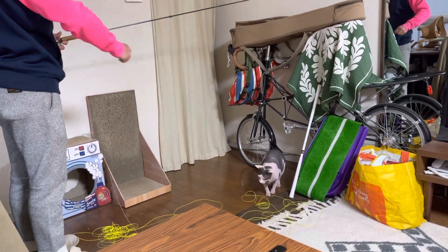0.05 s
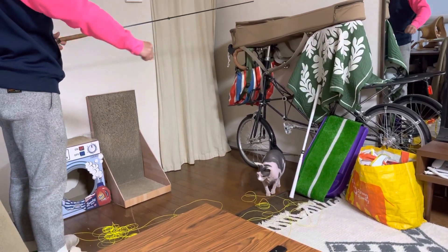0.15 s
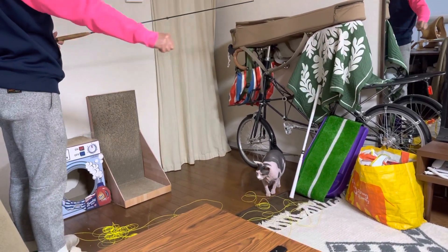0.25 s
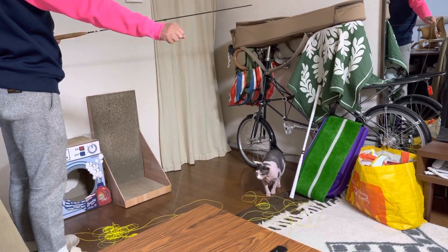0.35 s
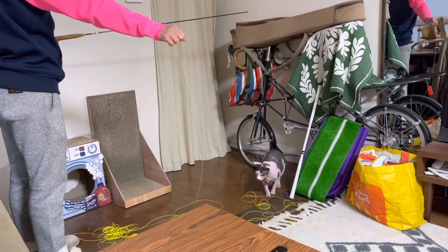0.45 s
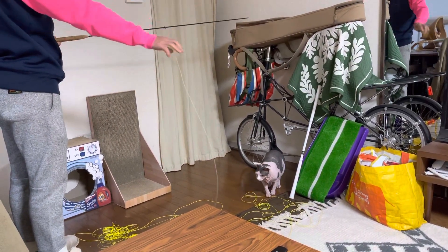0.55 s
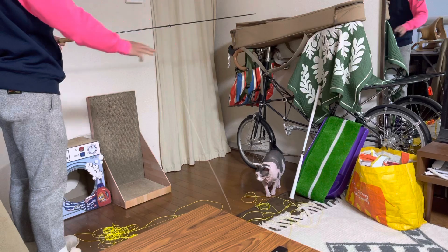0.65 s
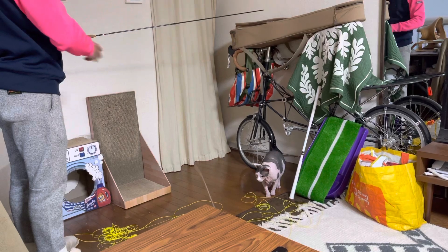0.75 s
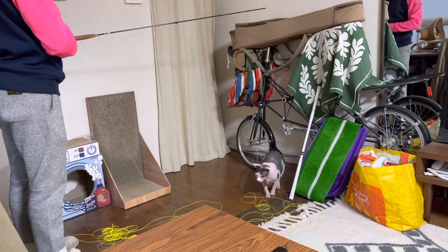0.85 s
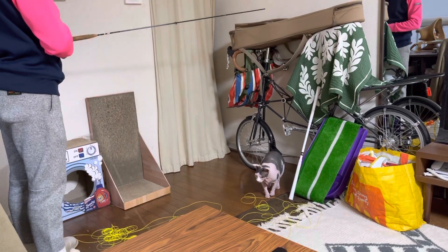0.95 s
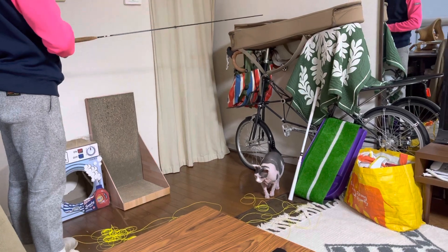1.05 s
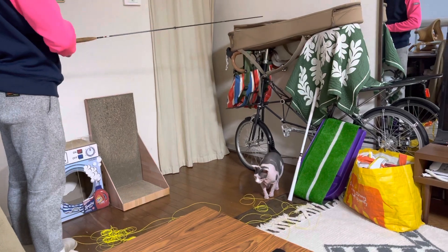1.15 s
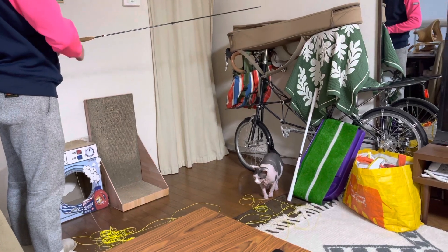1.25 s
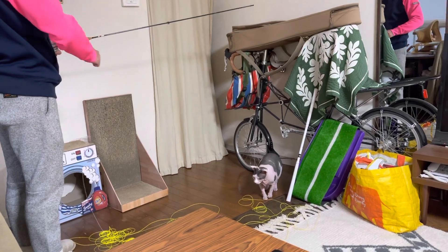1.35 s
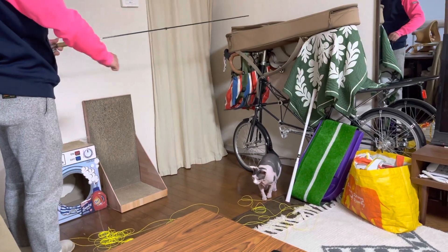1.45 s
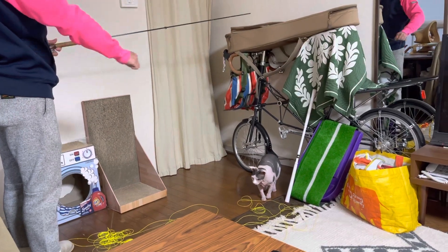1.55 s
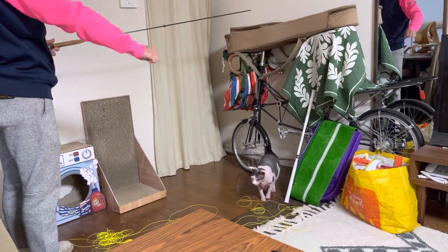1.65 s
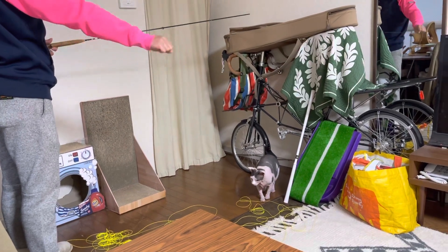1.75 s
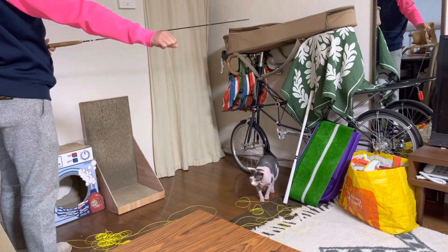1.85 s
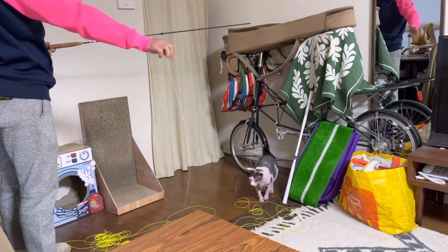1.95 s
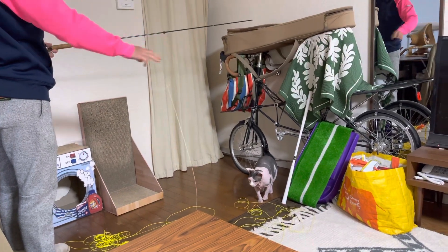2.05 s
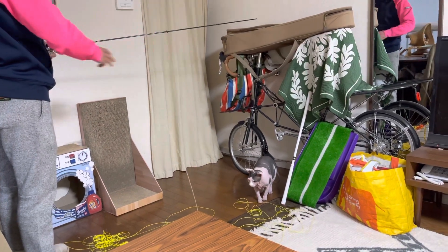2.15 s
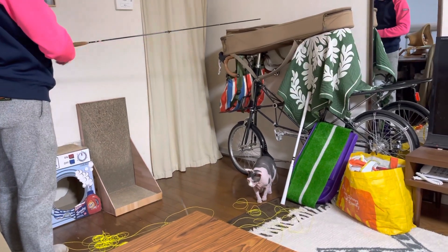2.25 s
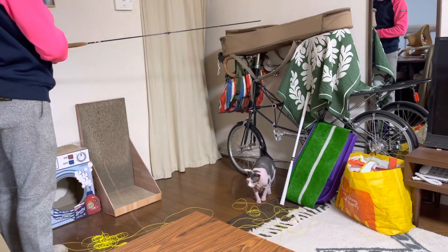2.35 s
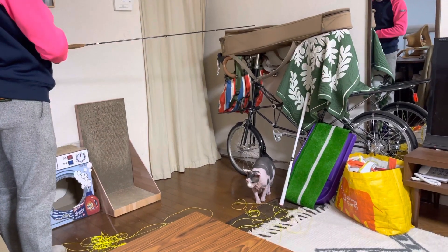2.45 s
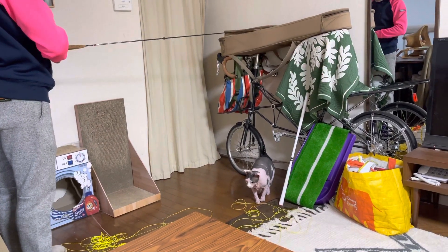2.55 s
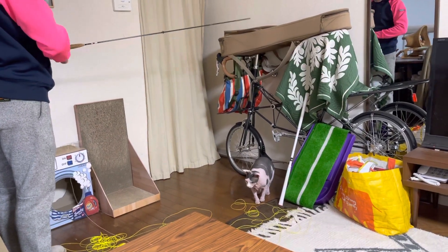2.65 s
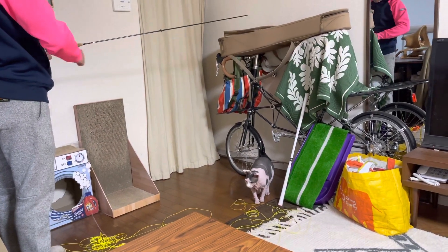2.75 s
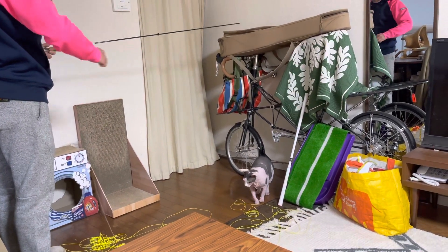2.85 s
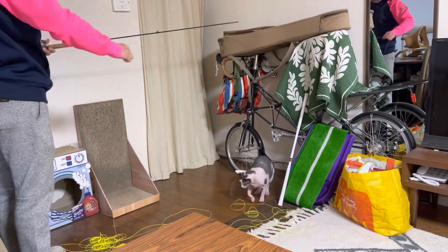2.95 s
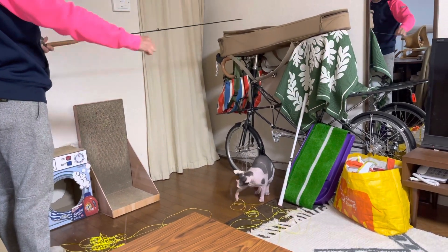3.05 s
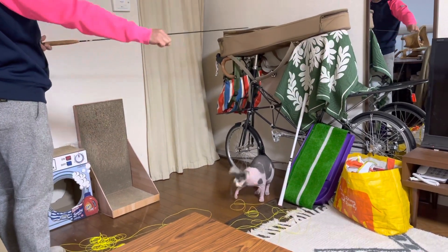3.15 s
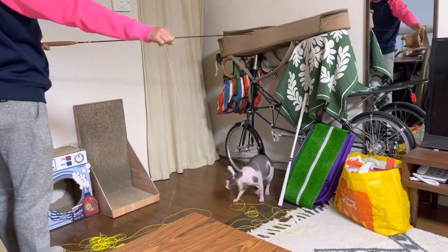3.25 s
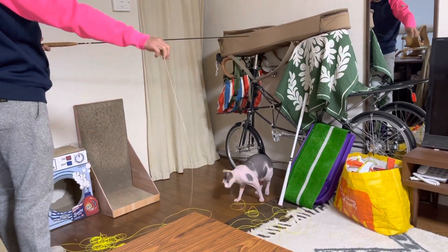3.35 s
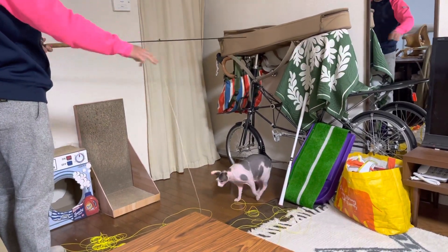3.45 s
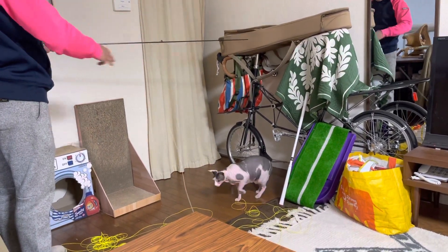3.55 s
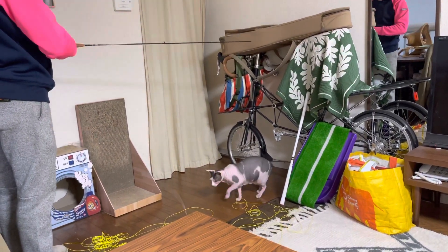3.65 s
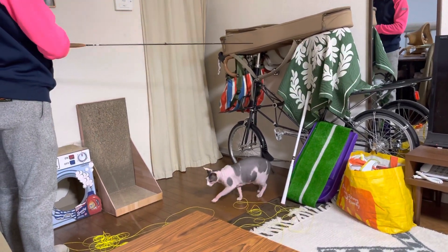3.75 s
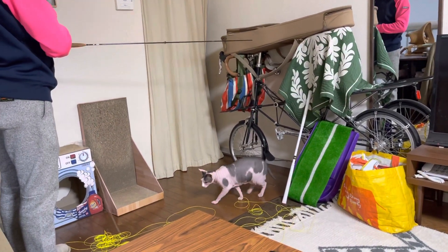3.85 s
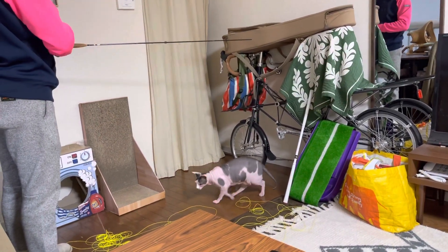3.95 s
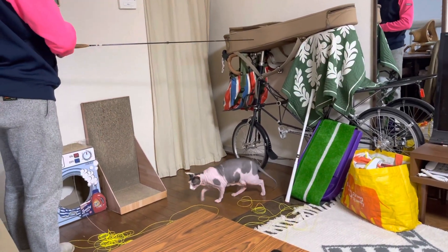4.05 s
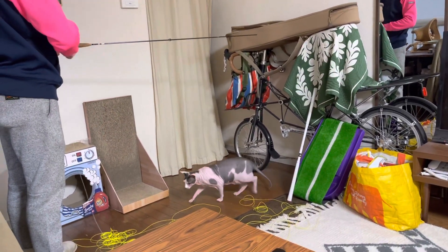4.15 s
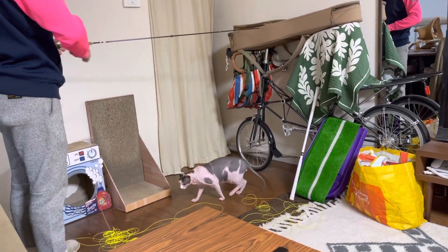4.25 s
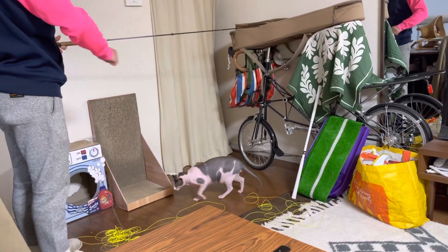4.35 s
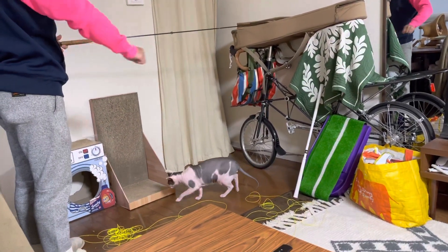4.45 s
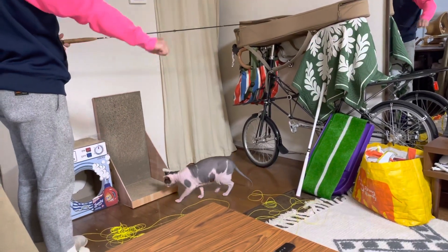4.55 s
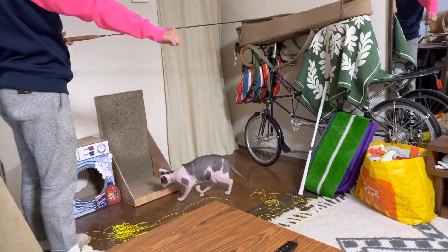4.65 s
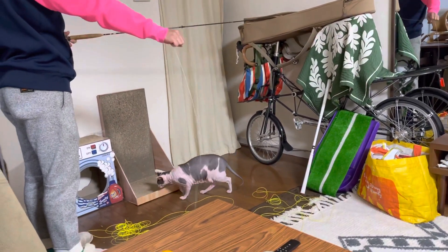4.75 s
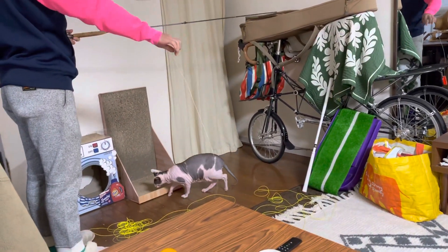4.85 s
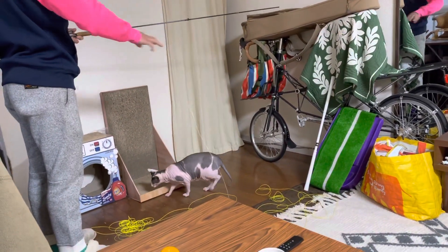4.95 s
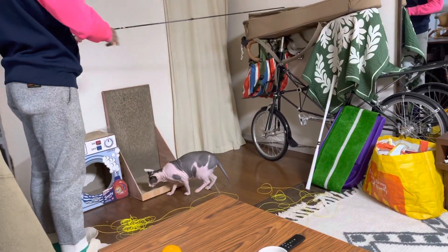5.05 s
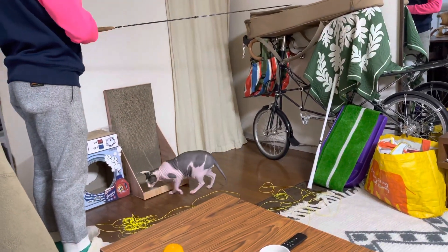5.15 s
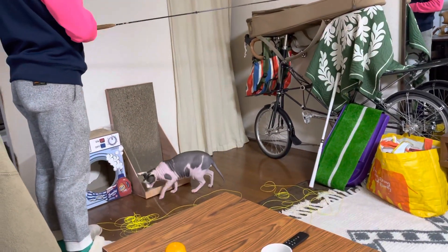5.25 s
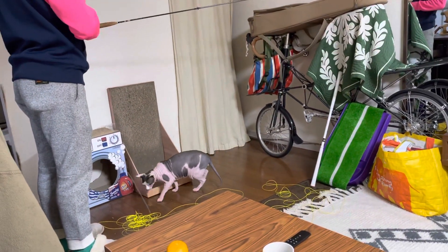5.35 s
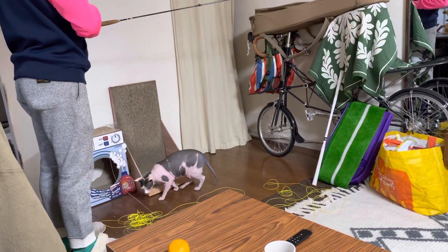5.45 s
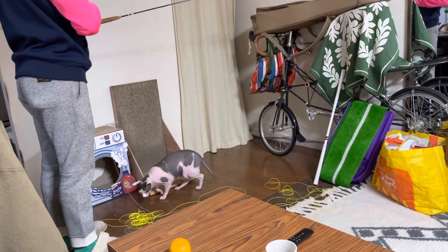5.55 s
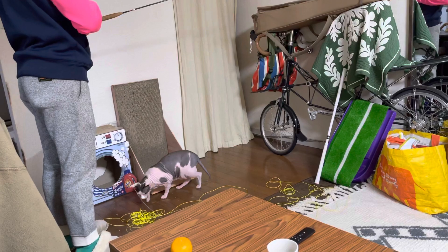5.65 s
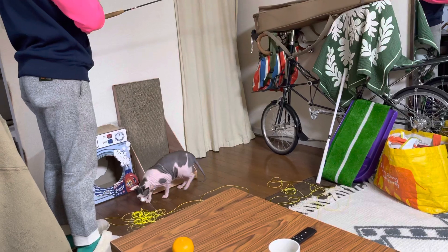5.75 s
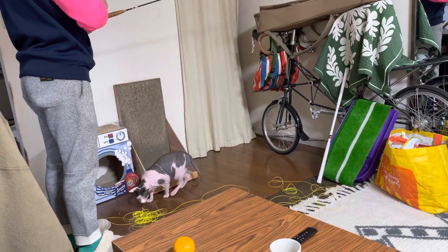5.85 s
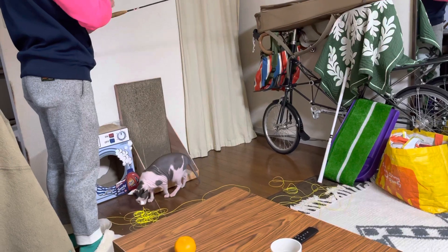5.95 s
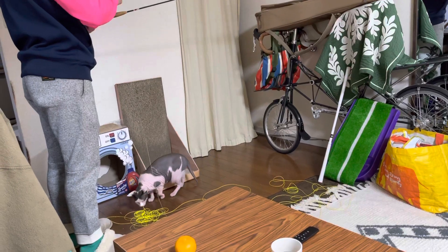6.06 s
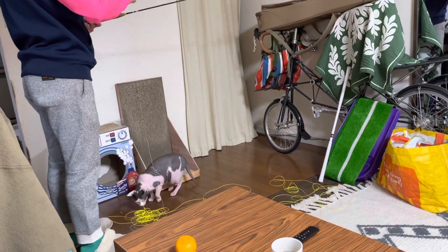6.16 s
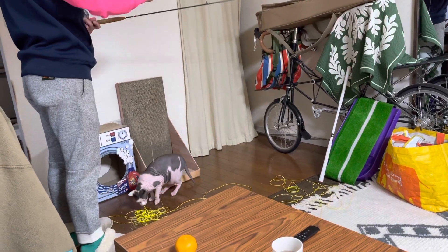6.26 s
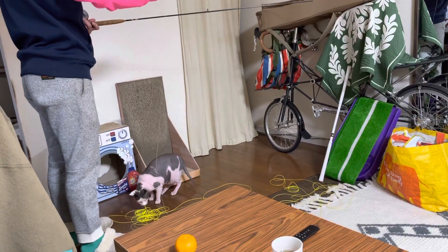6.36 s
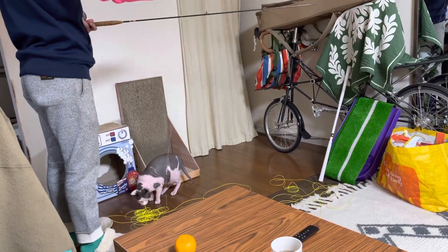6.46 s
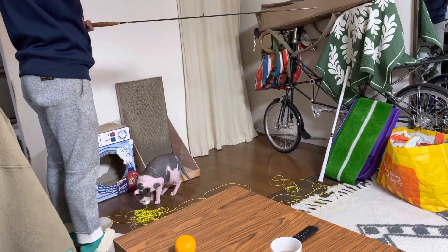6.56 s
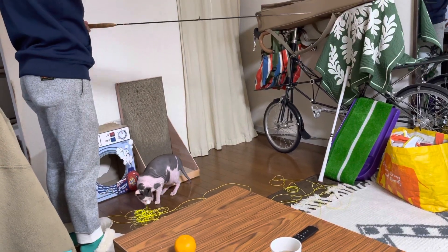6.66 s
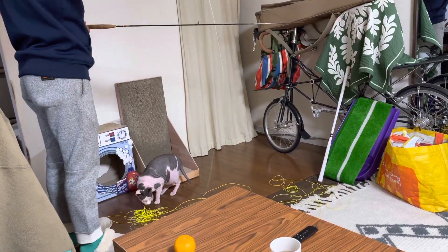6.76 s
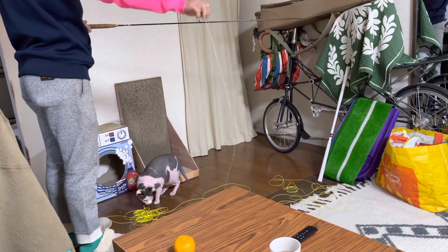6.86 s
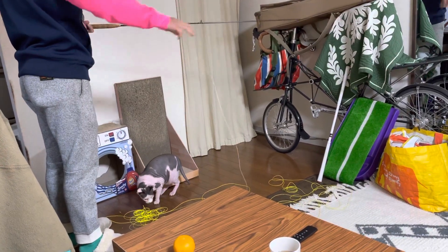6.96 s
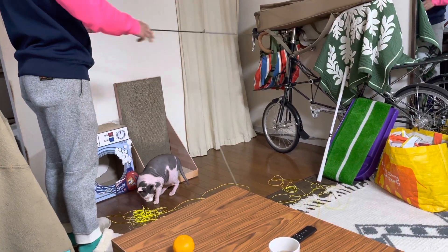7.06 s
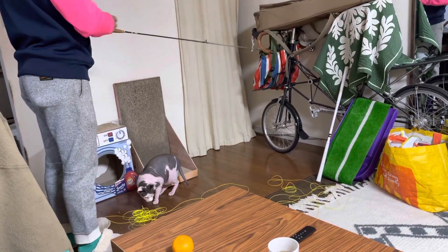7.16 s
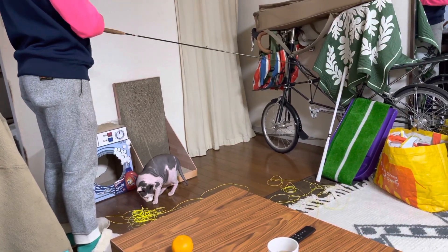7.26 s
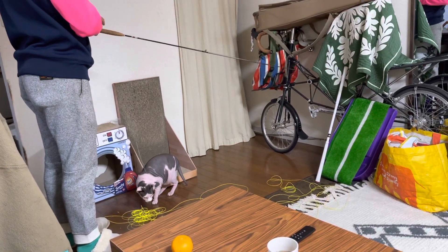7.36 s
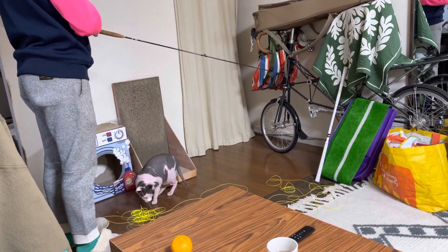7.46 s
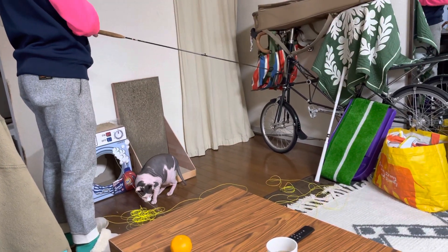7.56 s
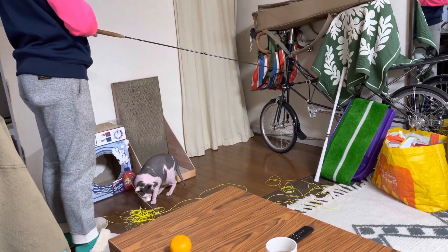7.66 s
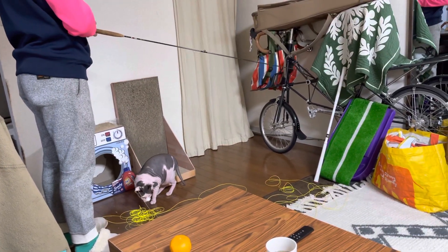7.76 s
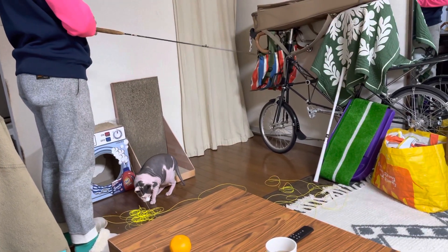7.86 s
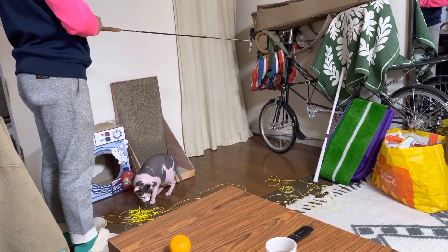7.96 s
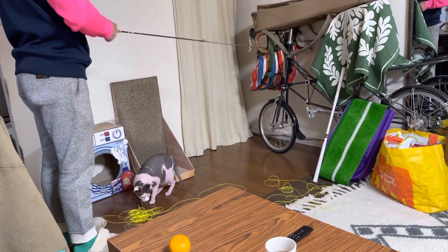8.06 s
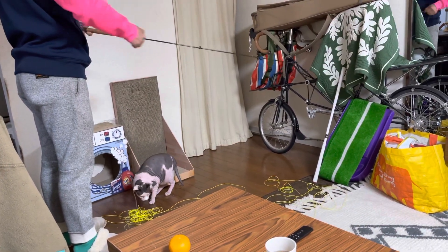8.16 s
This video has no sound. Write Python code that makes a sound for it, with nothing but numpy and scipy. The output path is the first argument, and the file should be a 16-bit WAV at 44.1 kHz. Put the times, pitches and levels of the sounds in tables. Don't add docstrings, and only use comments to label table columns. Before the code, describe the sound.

Close in a small quiet living room, a fishing reel's ratchet buzzes in short bursts as line is pulled off by hand. Four pulls come about a second and a half apart, each starting as fast clicks, rising to a crisp buzz, then stopping. A few slow separate clicks lead to a longer, accelerating pull; after a pause, one last burst surges up sharply. Soft hum and faint rustles fill the gaps; phone microphone, stereo.

```python
import sys
import numpy as np
from scipy import signal
from scipy.fft import rfft, irfft, next_fast_len
from scipy.io import wavfile
from scipy.ndimage import uniform_filter1d

SR = 44100
rng = np.random.default_rng(int(sys.argv[2]) if len(sys.argv) > 2 else 0)


def dump(signal):
    limited = np.clip(np.atleast_2d(signal).T, -1, 1)
    pcm = np.round(limited * 32767).astype(np.int16)
    wavfile.write(sys.argv[1], SR, pcm)


def makeup_ratio(level_db):
    decades = np.asarray(level_db, float) / 20
    return 10 ** decades


N = 361606

# t/s, rate/(teeth per s)
SPOOL_SPEED = [
    [(0, 405), (.06, 413), (.11, 512), (.178, 445), (.25, 455), (.322, 394), (.345, 335), (.46, 215)],
    [(1.154, 75), (1.19, 105), (1.29, 315), (1.362, 359), (1.43, 372), (1.5, 396), (1.656, 434),
     (1.708, 417), (1.87, 220)],
    [(2.606, 80), (2.66, 150), (2.79, 392), (2.9, 432), (2.946, 514), (3.02, 523), (3.068, 518),
     (3.122, 444), (3.3, 250)],
    [(4.103, 78), (4.14, 100), (4.26, 280), (4.4, 328), (4.514, 288), (4.67, 296), (4.71, 200)],
    [(5.661, 59), (5.725, 59), (5.765, 77), (5.805, 77), (5.84, 92), (5.93, 94), (6.0, 155)],
    [(6.012, 165), (6.08, 215), (6.152, 305)],
    [(6.162, 324), (6.216, 316), (6.26, 284), (6.376, 302), (6.432, 380), (6.48, 385), (6.59, 497),
     (6.68, 413), (6.74, 250)],
    [(7.858, 55), (7.95, 165), (8.0, 300), (8.12, 540), (8.17, 665), (8.19, 670)],
]
# t/s, level/dB
SINGLE_TEETH = [
    (5.583, -9.5),
    (5.599, -6),
    (5.61, -7),
    (5.639, -4.5),
    (7.1565, -11),
]
# strength/dB, low ring of the frame/dB, letting go/s, letting go/dB
TUGS = [
    (-31, -13.5, .07, -12.5),
    (-31.5, -12.5, 0.022, -8),
    (-31, -13.5, 0.08, -17),
    (-31, -14, 0.11, -7.5),
    (-29, -13.5, .03, 0),
    (-31.5, -12.5, 0.023, 3.5),
    (-30, -15, 0.09, -12.5),
    (-30.5, -12.5, .03, 4),
]
HAND_SHAKE = [0, 0, 0, .015, 0, 0, .002, 0]
# f/Hz,
# level/dB
SNAP_COLOUR = [(500, -54), (1450, -44), (1900, -32.5), (3000, -28.5), (4200, -22.5), (5200, -21.5),
               (6000, -15.5), (7800, -12.5), (9000, -6), (10300, 1.5), (11500, -8.5), (12500, -17),
               (14100, -29), (15500, -21.5)]
# f/Hz, level over the snap/dB, time to fall 60 dB/s
FRAME_RINGS = [(625, 16, .08), (1980, 7, .04), (2160, 7, .04), (2600, 6, .04), (2930, 5, .045),
               (3530, 4, .04), (4090, 4, .03), (4360, 5, .035), (5620, 3, .035), (5920, 6, .025),
               (6450, 5, .03), (6730, 3, .025), (7150, 3, .03), (9040, 2, .03), (11050, 2, .025)]
# delay/ms, level/dB
ARRIVALS = [(0, -2), (1.5, -6), (2.5, -7), (3.7, -2), (5.1, -7), (6.8, -4), (7.6, -6), (9.2, -3),
            (10.2, -2), (11, -3), (13, -8), (18.5, -8)]
# f/Hz, time to fall 60 dB/s
ROOM_T60 = [(500, 0.6), (3000, 0.18), (6000, 0.18), (10000, 0.15), (14000, 0.15)]
# delay/ms, level/dB
GLINT_PATH = [(0, -4), (2.5, 0), (5.1, -11), (8, -13)]
# t/s, open/(0-1)
ARM_GAP = [(4.8, .4), (5.55, .15), (5.66, .25), (5.7, .6), (5.76, .85), (5.9, .65), (6.1, .55), (6.7, .45),
           (7.1, .05), (7.9, .35)]
# f/Hz, level per Hz/dB
AIR_COLOUR = [(13, -46), (22, -17.5), (54, -5), (96, -8), (245, -1.5), (330, -2.5), (418, -10.5),
              (455, -11), (587, -12.5), (640, 0.5), (792, -9), (1410, -11.5), (1530, -26), (1740, -8),
              (3600, -45), (4680, -64), (7920, -120)]
# f/Hz, likeness/(0-1)
AIR_ALIKE = [(40, 0.79), (130, 0.96), (290, 0.53), (600, 0.36), (3000, 0.36)]
# f/Hz, width/Hz, level/dB
HUM = [(783, 14, -75), (625, 5, -76.5), (1025, 14, -78)]
# t/s, level/dB, length/s
RUMBLE = [(0, -68, 0.034), (.47, -71.5, 0.21), (1.798, -82, 0.075), (2.3, -79, 0.43), (3.263, -63, .18),
          (3.9, -61.5, 0.14), (4.24, -59, 0.11), (4.5, -61, 0.16), (4.8, -65, .08), (5.133, -66, .07),
          (5.41, -67, 0.074), (5.88, -67, .13), (6.45, -79, 0.43), (7.74, -70, .1), (7.996, -66, 0.056)]
# f/Hz, level per Hz/dB
HISS_COLOUR = [(2000, -22), (3600, -5.5), (6000, -5.5), (9000, -4), (10300, -5.5), (11800, -20.5),
               (13000, -32.5), (15000, -52.5)]
# t/s, centre f/Hz, width/Hz, level/dB, length/s
RUSTLES = [(0.928, 9000, 4000, -83, 0.079), (2.335, 9200, 3500, -63.5, 0.013),
           (2.368, 8600, 3000, -78.5, 0.024), (3.415, 8000, 4000, -73, 0.03),
           (3.61, 6350, 917, -69, 0.0037), (3.66, 6000, 700, -72.5, 0.0055),
           (3.72, 6000, 700, -60.5, 0.0036), (3.756, 5430, 1800, -66, 0.022),
           (3.796, 9900, 2980, -74.5, 0.033), (3.906, 10700, 3000, -78, 0.014),
           (4.068, 4500, 3500, -70.5, .02), (5.167, 4800, 1500, -81, 0.0072), (5.37, 4800, 1500, -78, .008),
           (5.036, 3160, 796, -62.5, 0.016), (5.057, 9400, 3000, -76, 0.046),
           (5.54, 9200, 3500, -65.5, 0.019), (7.27, 2970, 3030, -70, 0.03),
           (7.58, 9800, 2950, -80.5, 0.069), (7.602, 5470, 2000, -60.5, 0.014),
           (7.69, 9800, 2480, -62, 0.011)]
# from f/Hz, to f/Hz, kept within level of their loud frames/dB
MUTED_BANDS = [(11900, 12400, 17), (12400, 12800, 9), (12800, 13150, 3), (13150, 13500, -1),
               (13500, 14400, -9), (14400, 14800, -1.5), (14800, 15200, 1), (15200, 15800, 2.5),
               (15800, 17000, -4)]
# t/s, length/s, above f/Hz
TREBLE_LOST = [
    (5.73, .24, 12600),
    (6.03, .08, 11500),
    (6.075, .04, 10300),
    (6.27, .07, 12400),
    (6.295, .03, 11400),
]
# handover f/Hz, in-step f/Hz, right leads/ms
PORT = (7900, 8600, .305)

TOOTH_LOW_DB = -24.5
FAST_PER_S = 400
SPEED_DB_PER_OCTAVE, REACH_DB_PER_S = 2.5, -2
LOW_DB_PER_OCTAVE, LOW_FULL_PER_S, LOW_LET_GO = 2.5, 480, 0.2
START_DB, START_S, FROM_REST_PER_S = -1, 0.035, 85
WOBBLE_S, WOBBLE_MOST, CALM_PER_S = .006, .045, .55
SLACK_WOBBLE = .03
ROOM_DB, POSES_PER_S = -1, 4.5
AIR_DB, HISS_DB, RUMBLE_REST_DB = -60.5, -82.5, -78.5
TOP_HZ = 15900


def on_log(table, hz):
    f, v = np.transpose(table)
    return np.interp(np.log(np.maximum(hz, 1)), np.log(f), v)


def causal(table, size=1024):
    cep = irfft(np.log(makeup_ratio(on_log(table, np.fft.rfftfreq(size, 1 / SR)))))
    cep[1:size // 2] *= 2
    cep[size // 2 + 1:] = 0
    return irfft(np.exp(rfft(cep)))


def level(x, db):
    return x * makeup_ratio(db) / np.sqrt(np.mean(x ** 2))


def walk(rate):
    k = int(SR / rate)
    held = np.repeat(rng.standard_normal(N // k + 1), k)
    return 1.30 * uniform_filter1d(uniform_filter1d(held, k), k)[:N]


def band(x, hz, width_hz, order=2):
    edges = [max(hz - width_hz / 2, 10), hz + width_hz / 2]
    return signal.sosfilt(signal.butter(order, edges, "bandpass", fs=SR, output="sos"), x)


def impulses(s, size, count=12):
    at = s[:, None] * SR
    taps = np.floor(at) + np.arange(-count, count + 1)
    window = np.cos(np.pi * (taps - at) / (2 * count + 2)) ** 2
    out = np.zeros(N + 4 * count)
    np.add.at(out, (taps + count).astype(int), size[:, None] * np.sinc(taps - at) * window)
    return out[count:N + count]


def pawl(scatter_db=.5, slip_s=.0003, slip=.2, skid_hz=5500, loose_s=13e-6, count=7):
    s, blow_db = np.transpose(SINGLE_TEETH)
    s, size, low = [s], [makeup_ratio(blow_db)], [makeup_ratio(np.full(len(s), TOOTH_LOW_DB))]
    for spool, shake, (tug_db, ring_db, go_s, go_db) in zip(SPOOL_SPEED, HAND_SHAKE, TUGS):
        at, rate = np.transpose(spool)
        t = np.arange(at[0], min(at[-1] + .01, (N - 1) / SR), 1 / SR)
        teeth = np.cumsum(np.interp(t, at, rate)) / SR
        hit = np.interp(np.arange(int(teeth[-1]) + 1), teeth, t)
        per_s = np.interp(hit, at, rate)
        chance = rng.standard_normal((3, len(hit)))

        going_db = go_db * np.clip(1 - (at[-1] - hit) / go_s, 0, 2) ** 2
        level_db = tug_db + SPEED_DB_PER_OCTAVE * np.log2(per_s / FAST_PER_S)
        level_db += REACH_DB_PER_S * (hit - at.mean()) + going_db
        level_db += START_DB * np.exp(-(hit - at[0]) / START_S) * (rate[0] < FROM_REST_PER_S)
        size.append(makeup_ratio(level_db + scatter_db * chance[1]) * np.sqrt(SR / per_s))
        slow_db = LOW_DB_PER_OCTAVE * np.minimum(np.log2(per_s / LOW_FULL_PER_S), 0)
        low.append(makeup_ratio(ring_db + slow_db + LOW_LET_GO * going_db))

        change = np.abs(np.gradient(np.log(per_s), hit))
        wobble = shake + SLACK_WOBBLE * (1 - per_s / rate.max())
        wobble = np.minimum(wobble + WOBBLE_S * np.maximum(change - CALM_PER_S, 0), WOBBLE_MOST)
        jerk = count ** 1.5 * uniform_filter1d(uniform_filter1d(chance[0], count), count)
        ease_in = np.interp(hit - hit[0], [0, .03], [0, 1])
        late = ease_in * uniform_filter1d(wobble, count) * jerk / per_s + loose_s * chance[2]
        s.append(np.clip(hit + late, at[0], (N - 1) / SR))
    s, size, low = map(np.concatenate, (s, size, low))
    skid = np.exp(-np.arange(100) / SR / slip_s)
    bright = impulses(s, size)
    high = signal.butter(4, skid_hz, "high", fs=SR, output="sos")
    scrape = signal.sosfilt(high, rng.standard_normal(N))
    skids = signal.fftconvolve(np.abs(bright), skid / np.linalg.norm(skid))[:N]
    return bright + slip * scrape * skids, impulses(s, size * low)


def reel(split_hz=4000, low_db=22, trim_db=2.5):
    t = np.arange(4096) / SR
    ring = (t == 0).astype(float)
    for hz, db, t60 in FRAME_RINGS:
        decay = np.log(1000) / t60
        ring += makeup_ratio(db) * 2 * decay / SR * np.exp(-decay * t) * np.cos(2 * np.pi * hz * t)
    body = signal.fftconvolve(ring, causal(SNAP_COLOUR))
    bright, low = pawl()
    high = signal.butter(2, split_hz, "high", fs=SR, output="sos")
    bottom = signal.butter(2, split_hz, "low", fs=SR, output="sos")
    drive = makeup_ratio(low_db) * signal.sosfilt(bottom, low) - signal.sosfilt(high, bright)
    return makeup_ratio(trim_db) * signal.fftconvolve(drive, body / np.linalg.norm(body))[:N]


def grip(x, swing_db=2.5, rate=18):
    change = 0
    for hz in 2000 * 1.32 ** np.arange(6):
        change = change + (makeup_ratio(swing_db * walk(rate)) - 1) * band(x, hz, .2 * hz, order=1)
    return x + change


def room(build_s=.012, alike=.5, spread_ms=.08, pose_db=1.5):
    t = np.arange(SR // 2) / SR
    noise = rng.standard_normal((3, len(t)))
    noise = np.sqrt(alike) * noise[0] + np.sqrt(1 - alike) * noise[1:]
    tail = 0
    for hz in 400 * 2 ** np.arange(0, 5.6, .5):
        tail = tail + band(noise, hz, 0.3 * hz) * np.exp(-np.log(1000) * t / on_log(ROOM_T60, hz))
    tail = tail * (1 - np.exp(-t / build_s))
    ms, db = np.transpose(ARRIVALS)
    chance = rng.standard_normal((len(ms), 3))
    size = makeup_ratio(db + pose_db * chance[:, 2])
    first = np.array([impulses((1 + ms + spread_ms * chance[:, side]) / 1000, size)[:len(t)] for side in (0, 1)])
    return first / np.linalg.norm(first[0]) + makeup_ratio(ROOM_DB) * tail / np.linalg.norm(tail[0])


def glint(dry, hz=10400, width_hz=2000, db=7):
    gap = np.interp(np.arange(N) / SR, *np.transpose(ARM_GAP))
    ms, arrival_db = np.transpose(GLINT_PATH)
    path = impulses((1 + ms) / 1000, makeup_ratio(arrival_db))[:1024]
    return makeup_ratio(db) * signal.fftconvolve(band(dry * gap ** 2, hz, width_hz), path)[:N]


def air():
    out = 0
    for hz in 26 * 2 ** np.arange(0, 7.3, .5):
        mid, side = band(rng.standard_normal((2, N)), hz, 0.44 * hz)
        alike = np.clip(on_log(AIR_ALIKE, hz), 0, 1)
        flicker_db = 1.1 * walk(7)
        sides = np.sqrt(1 + alike) * mid + np.sqrt(1 - alike) * side * np.array([[1], [-1]])
        out = out + makeup_ratio(on_log(AIR_COLOUR, hz) + flicker_db) * sides
    hum = sum(level(band(rng.standard_normal((2, N)), hz, width_hz), db) for hz, width_hz, db in HUM)
    t = np.arange(N) / SR
    swell = makeup_ratio(RUMBLE_REST_DB) + sum(makeup_ratio(db) * np.exp(-((t - s) / length) ** 2) for s, db, length in RUMBLE)
    shared = rng.standard_normal(N) + 0.23 * rng.standard_normal((2, N))
    rumble = level(band(shared, 60, 30, order=3), -1.4) * swell
    hiss = signal.fftconvolve(rng.standard_normal((2, N)), causal(HISS_COLOUR)[None])[:, :N]
    return level(out, AIR_DB) + rumble + hum + level(hiss, HISS_DB)


def rustles():
    out, t = np.zeros(N), np.arange(8192) / SR
    for s, hz, width_hz, db, length in RUSTLES:
        grain = np.exp(0.23 * np.repeat(rng.standard_normal(128), 64))
        grit = rng.standard_normal(8192) * grain
        puff = np.minimum(t / (.15 * length), 1) * np.exp(-(t / length) ** 2)
        i = int(s * SR)
        out[i:i + 8192] += level(band(grit, hz, width_hz, order=3), db) * puff
    return out


def scene(count=4):
    early = int(SR / 1000)
    dry = np.append(grip(reel())[early:], np.zeros(early)) + rustles()
    sway = np.arange(N) / SR * POSES_PER_S
    wet = glint(dry) + air()
    for pose in range(count):
        near = np.clip(1 - np.abs((sway - pose + count / 2) % count - count / 2), 0, 1)
        wet = wet + signal.fftconvolve(dry[None] * np.sin(near * np.pi / 2), room())[:, :N]
    return wet


def mute(x, whim_db=2.6, size=2048):
    hz, s, spec = signal.stft(x, SR, "cosine", size)
    keep = np.ones(spec.shape[1:])
    for lo, hi, within_db in MUTED_BANDS:
        rows = (hz >= lo) & (hz < hi)
        db = 10 * np.log10(np.mean(np.abs(spec[:, rows]) ** 2, axis=(0, 1)) + 1e-18)
        whim = whim_db * uniform_filter1d(rng.standard_normal(len(db)), size=2) * np.sqrt(2)
        keep[rows] = db + whim > np.percentile(db, 85) - within_db
    for at, length, above_hz in TREBLE_LOST:
        keep[np.ix_(hz > above_hz, (s > at) & (s < at + length))] = 0
    return signal.istft(spec * keep, SR, "cosine", size)[1][:, :N]


def low_pass(x):
    return signal.sosfilt(signal.butter(12, 17130, fs=SR, output="sos"), x)


def record(dry):
    handover_hz, step_hz, lead_ms = PORT
    size = next_fast_len(N)
    hz, spec = np.fft.rfftfreq(size, 1 / SR), rfft(dry, size)
    share = 1 / (1 + (handover_hz / np.maximum(hz, 1)) ** 14)
    turn = np.exp(1j * np.pi * (hz - step_hz) * lead_ms / 1000 * np.array([[-1], [1]]))
    top_cut = np.clip((TOP_HZ - hz) / 300, 0, 1) ** 2
    spec = ((1 - share) * spec + share * turn * spec[0]) * top_cut
    mix = mute(irfft(spec, size)[:, :N])
    return low_pass(mix)


dry = scene()
out = record(dry)
dump(out)
```